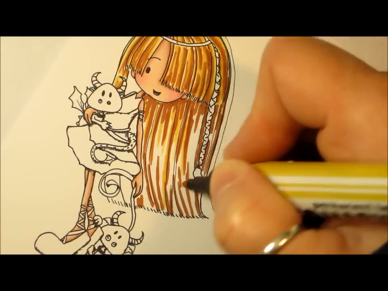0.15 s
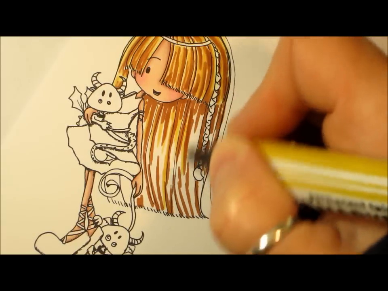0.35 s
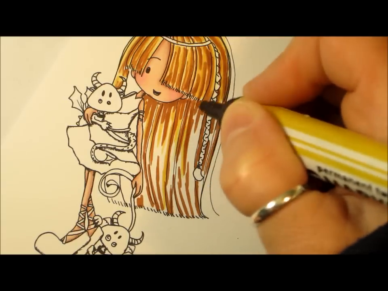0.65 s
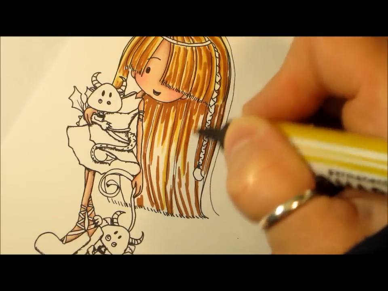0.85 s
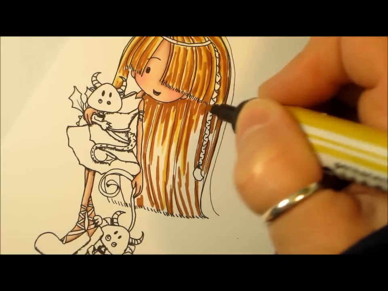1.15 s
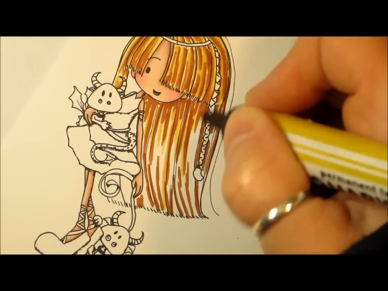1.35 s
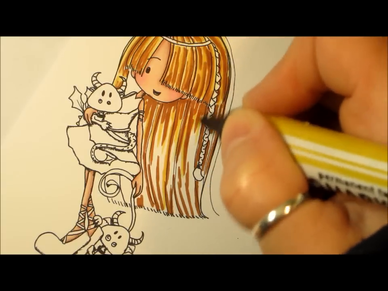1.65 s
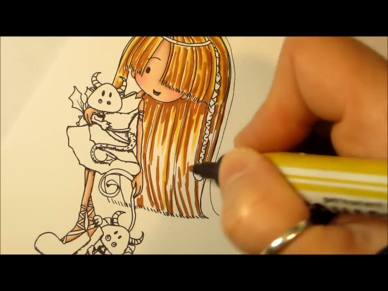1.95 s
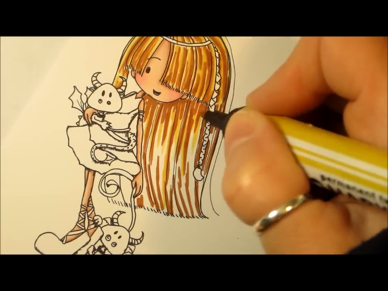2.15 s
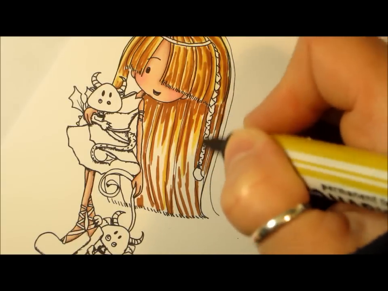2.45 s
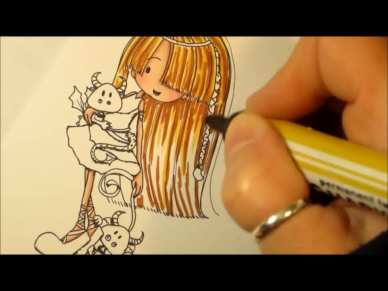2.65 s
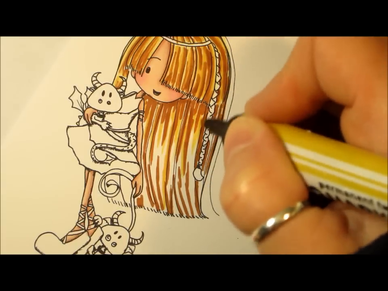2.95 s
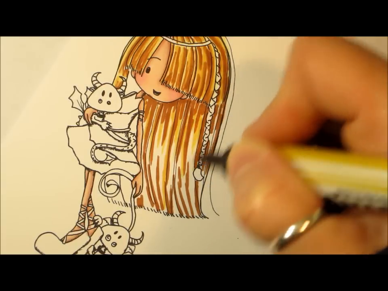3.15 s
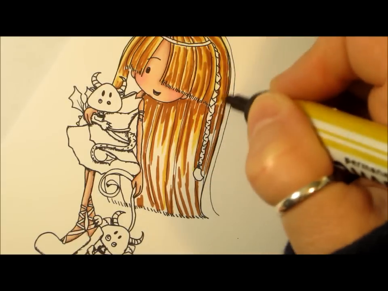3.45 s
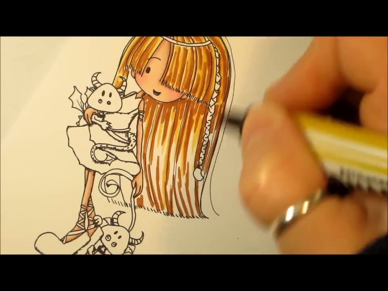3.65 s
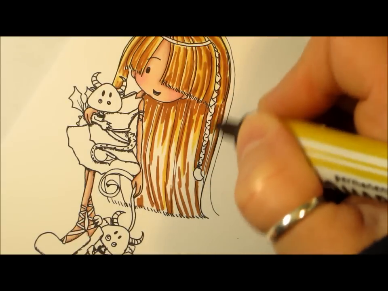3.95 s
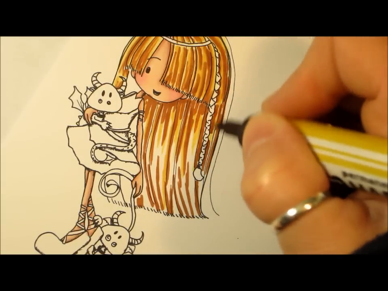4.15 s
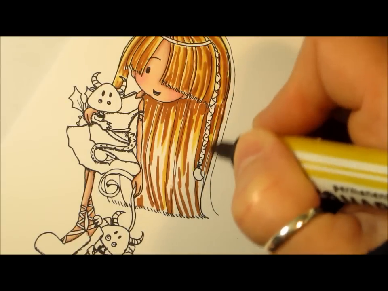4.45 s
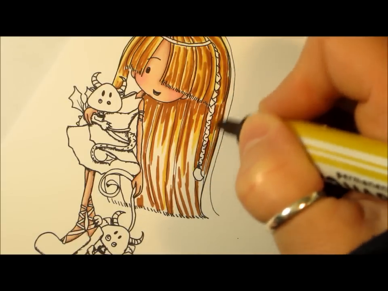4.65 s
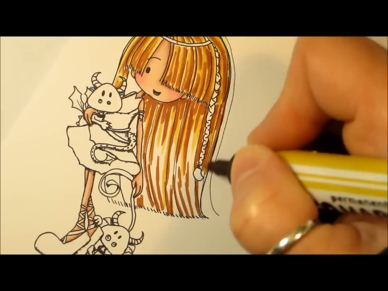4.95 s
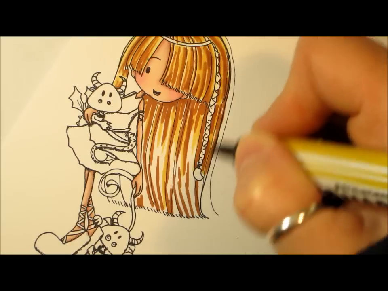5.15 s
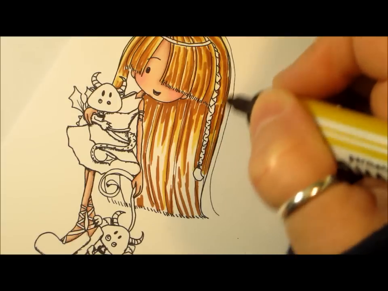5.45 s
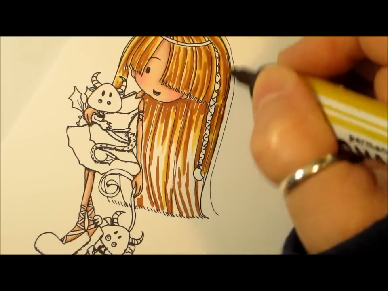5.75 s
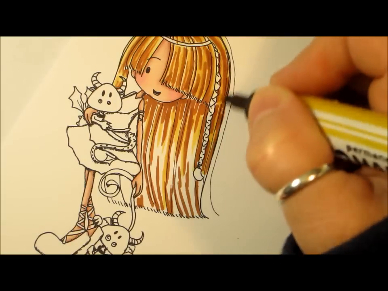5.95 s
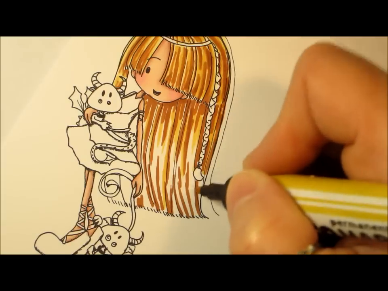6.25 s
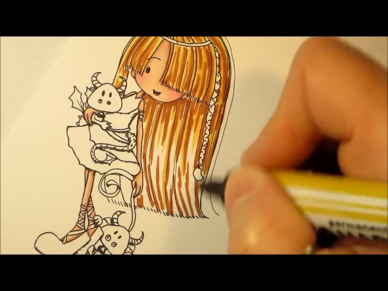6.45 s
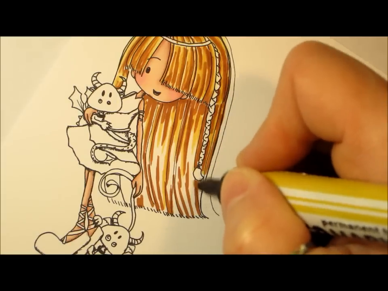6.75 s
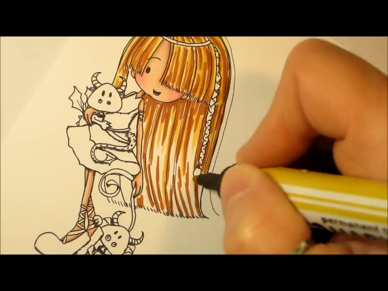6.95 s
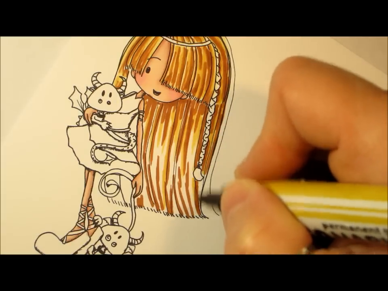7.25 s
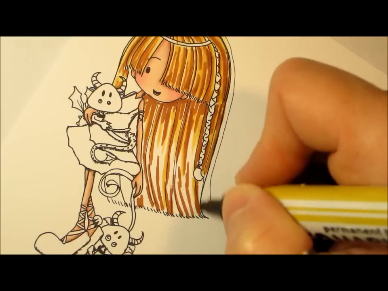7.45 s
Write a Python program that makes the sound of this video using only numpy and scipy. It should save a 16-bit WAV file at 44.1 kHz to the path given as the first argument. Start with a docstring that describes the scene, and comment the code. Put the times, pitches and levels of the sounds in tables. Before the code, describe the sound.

A quiet room heard close to a desk through a small camera microphone: steady low hum, soft fan rumble and hiss, with a thin constant high electronic whine. From the start a felt marker makes short, dry, bright scratches on paper, each about a tenth of a second, swelling and fading, two to four per second, with a faint woody resonance from the desk. Soft knocks fall near 0.3, 0.6, 1.1 and 2.5 s, with light hand brushes around 0.5, 1.1 and 2 s. Strokes get stronger near 3 s; then a hand slide and small taps at 3.2 s precede a brief gap. From 3.6 to 6 s the strokes come steadily, loudest around 4.6 and 5.2 s. At 6.1 s a thud and a clear rustle of the hand, then a pause; separate strokes follow at 6.8, 7.0 and 7.3 s, with a last one at 7.5 s.

```python
"""Felt marker at a desk

A quiet room with the small camera's microphone close to a desk: mains hum, fan rumble and hiss are sine tones
and shaped noise, and the camera's picture scanning leaks a thin whine into its sound. Soft knocks on the desk
are short noise bursts, the hand sliding over the sheet is brushed noise, and the felt marker colouring in quick
short strokes is uneven noise pushes through the resonances of nib, barrel, sheet and desk."""
import sys
import numpy as np
from scipy import signal
from scipy.fft import rfft, irfft, next_fast_len
from scipy.io import wavfile
from scipy.ndimage import uniform_filter1d, map_coordinates

SR = 44100
rng = np.random.default_rng(int(sys.argv[2]) if len(sys.argv) > 2 else 0)


def inscribe(sig):
    """Save sig as 16-bit PCM at rate SR to the path in sys.argv[1].

    A 1-D sig is mono; a 2-D sig holds one channel per row.
    Samples are clipped to [-1, 1] before scaling.
    """
    pcm = np.round(np.clip(np.atleast_2d(sig).T, -1, 1) * 32767)
    wavfile.write(sys.argv[1], SR, pcm.astype(np.int16))


N = 336042  # length in samples


def amp(db):
    """Gain of a level in dB."""
    return 10 ** (np.asarray(db) / 20)


def unit(x):
    """x at rms 1."""
    return x / np.sqrt(np.mean(x ** 2))


def filtered(x, response):
    """x shaped by a response, a function of frequency in Hz."""
    size = 2 * next_fast_len(N // 2 + 4096)  # room for tails past the end
    freqs = np.fft.rfftfreq(size, 1 / SR)
    return irfft(rfft(x, size) * response(freqs), size)[:N]


def slope(points):
    """Gain through (f/Hz, level/dB) points on a log axis, falling away an octave beyond both ends."""
    low_end, high_end = (points[0][0] / 2, -120), (points[-1][0] * 2, -120)
    f, db = np.transpose([low_end, *points, high_end])
    return lambda hz: amp(np.interp(np.log(hz + 1), np.log(f), db))


def modes(table):
    """Gain of damped resonances (f/Hz, width/Hz, level/dB) added in power."""
    def power(f, centre, width, db):
        damping = (f * width) ** 2
        return amp(2 * db) * damping / ((centre * centre - f * f) ** 2 + damping)
    return lambda f: np.sqrt(sum(power(f, *mode) for mode in table))


def above(hz):
    """A smooth step from 0 to 1 at hz."""
    return lambda f: 1 / (1 + (hz / (f + 1)) ** 24)


def causal(gain):
    """Minimum-phase response of a gain: it starts with the push and not before it."""
    def response(f):
        cepstrum = irfft(np.log(gain(f) + 1e-6))
        half = len(cepstrum) // 2
        folded = np.r_[cepstrum[0], 2 * cepstrum[1:half], np.zeros(len(cepstrum) - half)]
        return np.exp(rfft(folded))[:len(f)]
    return response


def wobble(rate):
    """A smooth random curve with rate knots a second."""
    knots = rng.standard_normal(int(N * rate / SR) + 4)
    return map_coordinates(knots, [np.arange(N) * rate / SR])


def fibres(spread_db, clump_db, clump_rate):
    """Fibres catch and let go: tiny pushes of very unequal size that come in clumps."""
    size_db = spread_db * rng.standard_normal(N) + clump_db * wobble(clump_rate)
    return unit(rng.standard_normal(N) * amp(size_db))


LAND_S = 0.0062  # the touch comes in softly
RISE_BEND, FALL_BEND = 2.23, 1.45  # how round the swell and the fade are
FALL_DB = 30  # drop of the main fade over the fall time, until the trail is louder
TRAIL_DB, TRAIL_DB_PER_S = -21.5, 133  # faint brush after the lift: level under the peak, speed of its fade


def swell(t, rise, hold, fall, touch_db):
    """Level under the peak in dB and gain of the landing, t seconds after a touch."""
    to_peak = np.clip(1 - t / rise, 0, 1)
    after = np.maximum(t - rise - hold, 0)
    main_db = -FALL_DB * (after / fall) ** FALL_BEND
    trail_db = TRAIL_DB - TRAIL_DB_PER_S * after
    under_db = touch_db * to_peak ** RISE_BEND + np.maximum(main_db, trail_db)
    return under_db, np.clip(t / LAND_S, 0, 1)


def lay(moves):
    """Rows of gains laid out in time from (t/s, gains); where two moves overlap the louder one counts."""
    out = np.zeros((len(moves[0][1]), N + SR))
    for start, gains in moves:
        span = out[:, round(start * SR):][:, :gains.shape[1]]
        span[:] = np.where(gains[0] > span[0], gains, span)
    return out[:, :N]


# hum tones in the room: (f/Hz, rms level/dB, size of the random waver/dB)
HUM_TONES = [(38, -68, 4), (59.98, -61.7, 1), (119.98, -51.6, .5), (133, -63, 3.5), (140.2, -59.7, 1.5)]
# spectrum of rumble, fans and microphone hiss: (f/Hz, relative level/dB)
ROOM_SPECTRUM = [(20, 0.5), (36, -1), (52, -0.5), (68, 5.5), (85, -0.5), (125, 2), (160, -1.5), (300, -3.5),
                 (700, -9), (2000, -16), (5000, -20), (9000, -22), (15700, -34.5)]
# a very faint high tone: (f/Hz, rms level/dB)
HIGH_TONE = [(13205, -89)]
ROOM_DB = -52.5  # rms of rumble and hiss, about which they waver


def room():
    """Wavering hum tones and a faint steady one, over slightly uneven rumble and hiss."""
    t = np.arange(N) / SR

    def tone(hz, rms_db):
        return np.sqrt(2) * amp(rms_db) * np.sin(2 * np.pi * (hz * t + rng.random()))

    hum = sum(tone(hz, db + waver_db * wobble(3)) for hz, db, waver_db in HUM_TONES)
    level = amp(ROOM_DB + 0.33 * wobble(4.2))
    hiss = level * unit(filtered(rng.standard_normal(N), slope(ROOM_SPECTRUM)))
    return hum + hiss + sum(tone(hz, db) for hz, db in HIGH_TONE)


# the two scan pauses in each frame: (start/frame, end/frame)
SCAN_PAUSES = [(.3046, .457), (.8023, .9609)]
FRAME_HZ, LINES = 30000 / 1001, 525
FLIP = .3752  # part of a frame at which the whine turns upside down


def whine():
    """A tone at half the line rate, louder in the scan pauses, turning upside down once a frame."""
    frames = np.arange(N) / SR * FRAME_HZ
    part = frames % 1

    def step(at):
        return .5 + .5 * np.tanh((part - at) / .009)

    pause = sum(step(start) - step(end) for start, end in SCAN_PAUSES)
    # alternating the sign by frame leaves no jump at the frame's edge, only the one at FLIP
    sign = (-1.) ** np.floor(frames) * np.tanh((part - FLIP) / .0106)
    lag = -.46 * (step(FLIP) - step(FLIP + .07))  # radians, just after the flip
    shape = sign * (1 + 1.11 * pause * np.exp(-.34j)) * np.exp(1j * lag)
    carrier = np.exp(2j * np.pi * LINES / 2 * frames)
    return amp(-54) * np.real(shape * carrier)


# soft knocks on the desk: (t/s, level/dB that is 2.5 dB under the peak, centre f/Hz, length of the pushes/s)
DESK_KNOCKS = [(0.287, -47, 207, 0.011), (0.55, -50, 218, 0.014), (1.102, -40.5, 589, 0.0098),
               (2.497, -40.5, 278, 0.012), (3.194, -43.5, 880, 0.013), (3.263, -43, 487, 0.0068),
               (3.283, -47, 527, 0.01), (5.606, -45, 453, 0.0082), (5.973, -49, 401, 0.0076),
               (6.138, -37.5, 570, 0.012)]


def knocks():
    """Each soft contact is a few milliseconds of uneven pushes that thud in the heavily damped desk top."""
    out, size = np.zeros(N + SR), SR // 20 + 1
    t, freqs = np.arange(size) / SR, np.fft.rfftfreq(size, 1 / SR)
    for start, db, hz, length in DESK_KNOCKS:
        press = np.sin(np.pi * np.clip(t / length, 0, 1) ** 2.0)
        pushes = rng.standard_normal(size) * press
        board = causal(lambda f: modes([(hz, hz, 0)])(f) ** 2 / (1 + (f / (1.6 * hz)) ** 4))
        thud = irfft(rfft(pushes) * board(freqs), size)
        first = round((start - .002) * SR)  # the pushes begin 2 ms ahead of t
        out[first:][:size] += amp(db + 2.5) * thud / np.abs(thud).max()
    return out[:N]


# slides of the hand over the sheet: (touch t/s, rise/s, hold/s, fall/s, peak level/dB before the hand's gains,
# level/dB at the touch under the peak, shift of the low rub at the start/dB, and at the end/dB)
HAND_SLIDES = [(0.47, .04, .005, .066, -59.5, -2, 3, 6), (1.078, .02, 0.038, .031, -52.5, -2, -3, 2),
               (2.03, .02, .03, .08, -64.5, -4, 0, 0), (3.153, 0.072, 0.031, .075, -48.5, -24, -11, 12),
               (6.068, .03, .06, .04, -57.5, -5, -3, 8), (6.141, 0.056, 0.072, 0.055, -46.5, -11, -4, -8)]
RUB_BEND = 1.1  # above 1 the rub shifts more late in a slide


def slides():
    """Each slide lands, swells, holds and fades while its low rub shifts."""
    moves = []
    for start, rise, hold, fall, peak_db, touch_db, first_db, last_db in HAND_SLIDES:
        t = np.arange(round((rise + hold + 2 * fall) * SR)) / SR
        under_db, land = swell(t, rise, hold, fall, touch_db)
        way = np.minimum(t / (rise + hold + fall), 1)
        rub_db = first_db + (last_db - first_db) * way ** RUB_BEND
        moves.append((start, np.array([amp(peak_db + under_db) * land, amp(rub_db)])))
    return lay(moves)


# spectrum of the brushing hiss: (f/Hz, relative level/dB)
SKIN_HISS = [(1500, -24.5), (2500, -11), (4000, -10), (5600, -4), (7000, -5), (9000, -10), (12000, -20),
             (15700, -32)]
# spectrum of the low rub: (f/Hz, relative level/dB)
LOW_RUB = [(300, -5), (600, 1.5), (1200, -3), (2000, -4.5)]


def hand():
    """Skin and sleeve brush the sheet: a smoother hiss with a low rub."""
    level, low = slides()
    push = fibres(spread_db=4.0, clump_db=0.5, clump_rate=170)
    hiss = unit(filtered(push, slope(SKIN_HISS)))
    rub = unit(filtered(push, slope(LOW_RUB)))
    return level * (amp(3.0) * hiss + amp(-6.0) * low * rub)


# pen strokes: (touch t/s, rise/s, fall/s, peak level/dB before the marker's gains, level/dB at the touch under
# the peak, desk gain/dB, barrel gain/dB, brightness/dB, gain in brightness over the rise and again the fall/dB)
PEN_STROKES = [(0.036, 0.064, 0.056, -40.5, -18, 0.5, -1, 0.5, 2.3),
               (0.317, 0.054, 0.049, -39.5, -12.5, 2.5, -2.4, 0.0, 5),
               (0.728, 0.048, 0.031, -37.5, -29, 0, -1.5, -1.5, 5),
               (0.969, 0.027, 0.037, -44.5, -6, -3, -3, 0.4, 1),
               (1.341, 0.043, 0.07, -42.6, -24.2, 4, 0.5, 0.8, 5),
               (1.624, 0.057, 0.051, -38, -29, 0.5, -0.5, 0.2, 5),
               (1.889, 0.034, 0.05, -42, -14, 2.5, 0.4, 0.7, 3),
               (1.955, 0.028, 0.025, -55, -2.6, 5.7, -0.5, 1, 2.3),
               (2.262, 0.049, 0.055, -39.5, -17, 1, -2, -0.5, 2.3),
               (2.499, 0.028, 0.061, -35.1, -5, 2.7, 1.5, -1.5, 2),
               (2.663, 0.052, 0.063, -36.5, -17, 0.7, 2.0, 0.5, 0),
               (2.884, 0.015, 0.062, -39, -30.0, -6, -3, -1.5, 4),
               (2.962, 0.084, 0.06, -32, -26, -1, -0.5, -1.6, 4),
               (3.604, 0.054, 0.066, -37.5, -23, 1.5, 0.5, 1.2, 2.3),
               (3.945, 0.059, 0.055, -37, -23, 0, 1, -2, 3), (4.212, 0.069, 0.061, -37, -21, 3.8, 3, -3, 2),
               (4.428, 0.066, 0.076, -41.5, -11.5, 6.5, 3.5, -2.5, 2.3),
               (4.574, 0.065, 0.057, -31, -17.2, -2.5, 1, -1, -1),
               (4.705, 0.014, 0.025, -56, -6, 0, 0, 2, 2.3), (4.732, 0.079, 0.077, -37, -21, 1, 2, 0, 0),
               (4.969, 0.051, 0.019, -52.5, -0.0, 5, 2, -2.5, 0),
               (5.104, 0.066, 0.04, -32.3, -16.5, -2.2, -2, 0.1, 2.5),
               (5.357, 0.048, 0.05, -35.2, -7.5, -3.7, -1, 0.5, 4),
               (5.554, 0.061, 0.052, -33.5, -12, -2.6, -0.5, 0.7, 3),
               (5.696, 0.011, 0.02, -53, -0.0, 2.2, 0.1, 1, 2.3),
               (5.749, 0.054, 0.054, -33.5, -15, -2, -1.5, 1.5, 4),
               (5.973, 0.025, 0.033, -38.5, -5, 0.5, 4.5, 0.2, 0),
               (6.02, 0.024, 0.039, -48, -19.8, -6, 2, 7, 2.3),
               (6.779, 0.046, 0.045, -35, -12, -1, -1, -3, 3),
               (7.018, 0.065, 0.053, -35, -15, -0.5, 0, -1.9, 2.3),
               (7.257, 0.039, 0.036, -38.5, -5.5, 0.5, -0.6, -1.3, 3),
               (7.49, 0.038, 0.037, -36.5, -10.5, 0, -2, 0, 4)]
DESK_KEEPS, BARREL_KEEPS = 0.29, 0.14  # share of the swell and fade that desk and barrel do not follow


def strokes():
    """Each stroke lands, swells to its peak and fades as the nib lifts, its brightness shifting on the way."""
    moves = []
    for start, rise, fall, peak_db, touch_db, desk_db, barrel_db, bright_db, gain_db in PEN_STROKES:
        t = np.arange(round((rise + 3 * fall) * SR)) / SR
        under_db, land = swell(t, rise, 0, fall, touch_db)
        way = np.where(t < rise, t / rise - 1, np.minimum((t - rise) / fall, 1))  # -1 touch, 0 peak, 1 lift
        level = amp(peak_db + under_db) * land
        desk = amp(desk_db - DESK_KEEPS * under_db)
        barrel = amp(barrel_db - BARREL_KEEPS * under_db)
        bright = amp(bright_db + gain_db * way)
        moves.append((start, np.array([level, desk, barrel, bright])))
    return lay(moves)


def regrip(x, depth_db):
    """The pen's angle keeps changing, so each resonance is stronger in one stroke and weaker in the next."""
    z = signal.stft(x, nperseg=256)[2]
    field = uniform_filter1d(rng.standard_normal(z.shape), size=2, axis=0)  # over frequency
    field = uniform_filter1d(field, size=40, axis=1)  # over time
    return signal.istft(z * amp(depth_db * unit(field)), nperseg=256)[1][:N]


# nib, barrel and sheet ring together: (f/Hz, width/Hz, relative level/dB)
NIB_MODES = [(2880, 38, -12.5), (3220, 180, -13.5), (3400, 80, -5), (3883, 95, 3.5), (4542, 104, 4),
             (4700, 99, 1), (4915, 94, 3), (5100, 95, 2.5), (5610, 130, 0.5), (5900, 140, -4),
             (5890, 76, -1), (6300, 78, -0.5), (6510, 200, 0), (7030, 270, 0.5), (7180, 91, 0),
             (7600, 250, -5.5), (8400, 360, -7.5), (9000, 160, -15), (9380, 130, -7.5), (9860, 210, -6.5),
             (10100, 180, -19.5), (10320, 83, -5), (10950, 180, -10), (11080, 170, -10.5),
             (11560, 130, -12), (12000, 200, -12.5), (12580, 150, -13.5), (12950, 250, -33),
             (13300, 160, -21), (13750, 250, -34)]
# broad scratch of the felt: (f/Hz, relative level/dB)
FELT_SCRATCH = [(1500, -24.5), (2300, -19.5), (3000, -19.5), (4200, -27), (6000, -11.5), (9000, -13),
                (12000, -27), (15700, -56)]
# desk resonances, before their gain is raised to a power: (f/Hz, width/Hz, relative level/dB)
DESK_MODES = [(515, 260, -1.5), (1006, 130, -0.5), (1190, 250, -2.5), (1333, 215, 0.5)]


def marker():
    """The nib drags over the paper grain; the pushes ring the pen and, weaker, the desk below."""
    level, desk, barrel, bright = strokes()
    push = fibres(spread_db=3.5, clump_db=0.5, clump_rate=300)
    pen = causal(lambda f: np.hypot(modes(NIB_MODES)(f), slope(FELT_SCRATCH)(f)))
    board = causal(lambda f: modes(DESK_MODES)(f) ** 1.68)
    force = push * level / np.std(filtered(push, pen))
    tip, edge, top = above(4230), above(5400), above(8300)
    # a nib that barely touches does not shake the pen's body
    contact = np.minimum(1, level / amp(-44)) ** 0.23
    # the grip decides how freely the barrel's low modes ring
    scratch = filtered(force * contact * barrel, lambda f: pen(f) * (1 - tip(f)))
    scratch += filtered(force * contact, lambda f: pen(f) * (tip(f) - edge(f)))
    # brightness shifts the upper scratch, most at the top
    scratch += filtered(force * bright ** 0.63, lambda f: pen(f) * (edge(f) - top(f)))
    scratch += filtered(force * bright, lambda f: pen(f) * top(f))
    wood = filtered(push * level * desk, board) / np.std(filtered(push, board))
    return amp(0.12) * regrip(scratch, depth_db=1.5) + amp(-16.5) * wood


def scene():
    """Pen, hand and desk in the room."""
    return (room() + knocks() + hand() + marker())[None]


def record(dry):
    """The camera adds its whine to the microphone's sound and keeps nothing above its band limit."""
    return filtered(dry[0] + whine(), lambda hz: hz < 15760)[None]


dry = scene()
out = record(dry)
inscribe(out)
```